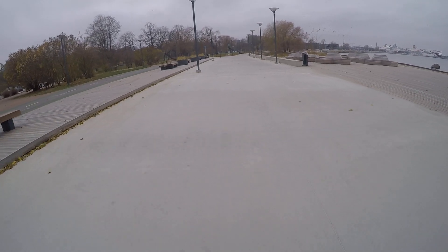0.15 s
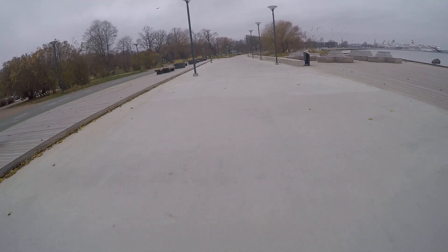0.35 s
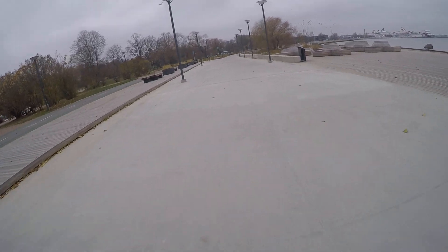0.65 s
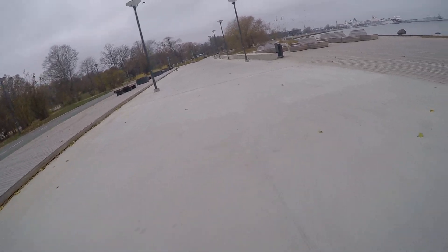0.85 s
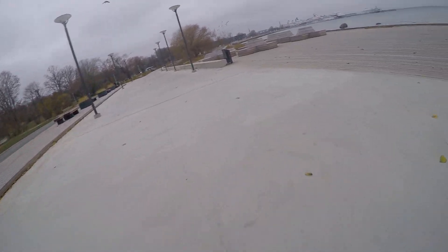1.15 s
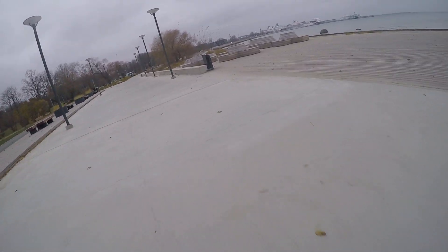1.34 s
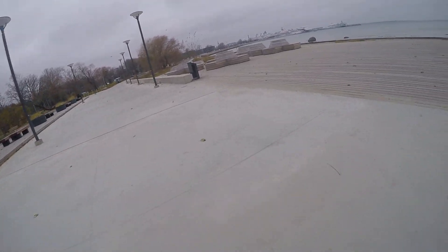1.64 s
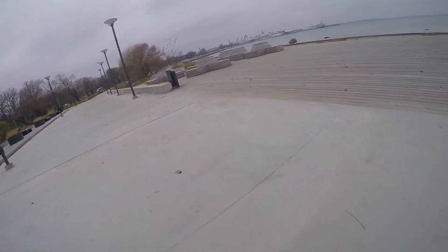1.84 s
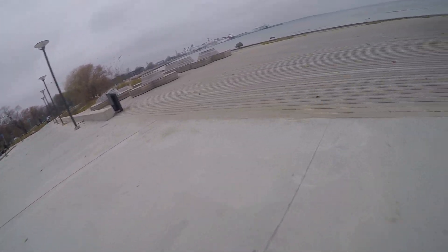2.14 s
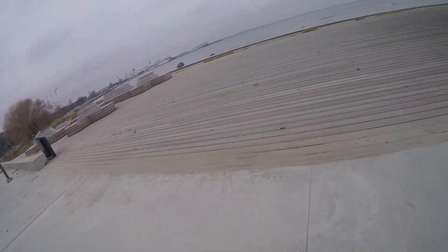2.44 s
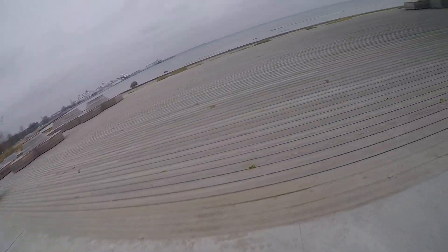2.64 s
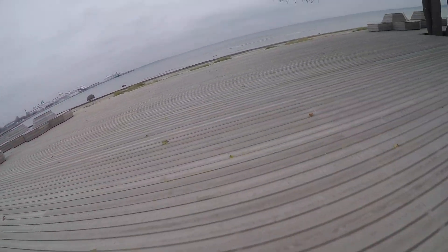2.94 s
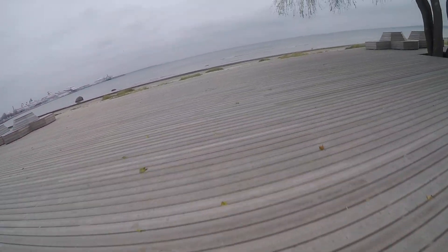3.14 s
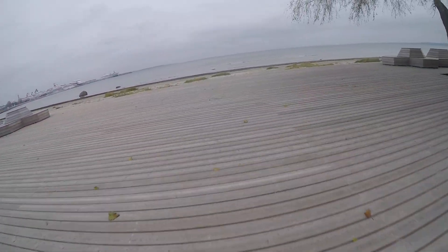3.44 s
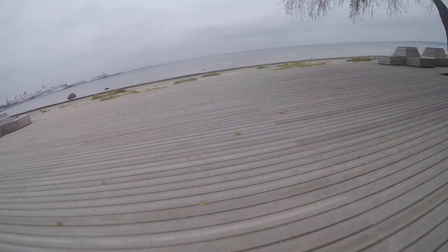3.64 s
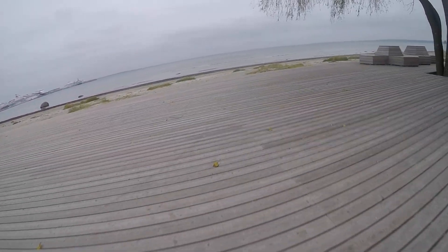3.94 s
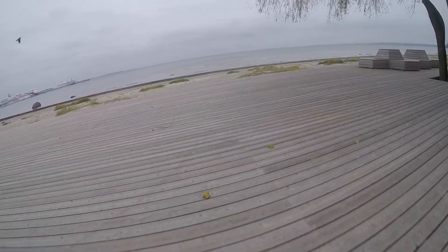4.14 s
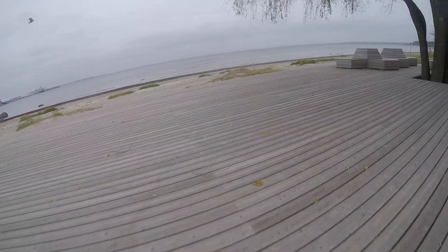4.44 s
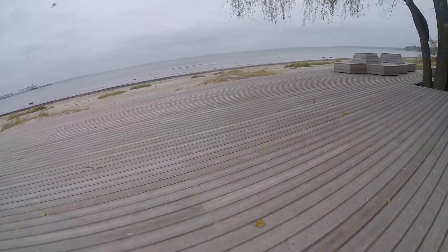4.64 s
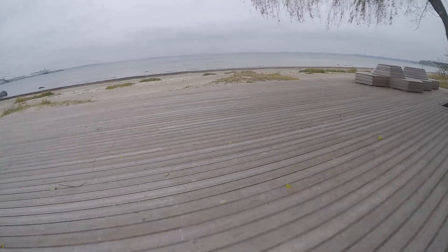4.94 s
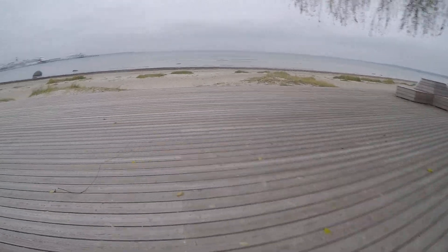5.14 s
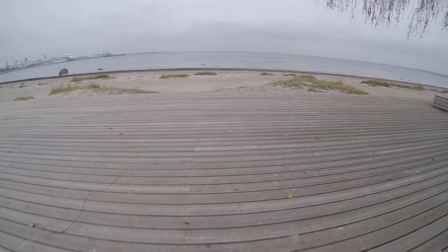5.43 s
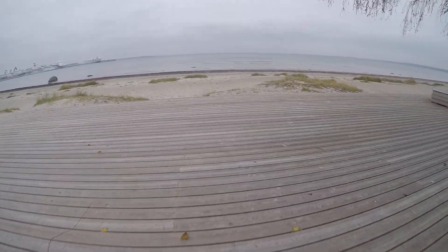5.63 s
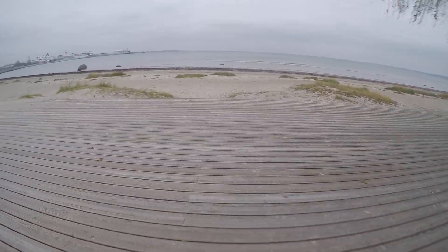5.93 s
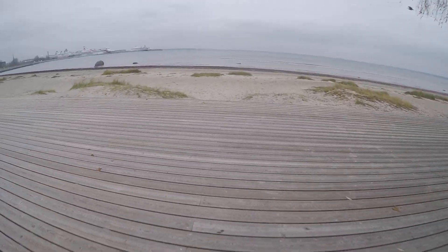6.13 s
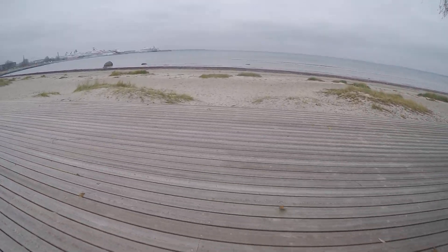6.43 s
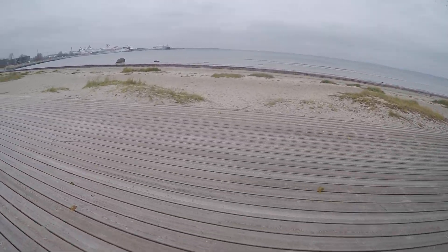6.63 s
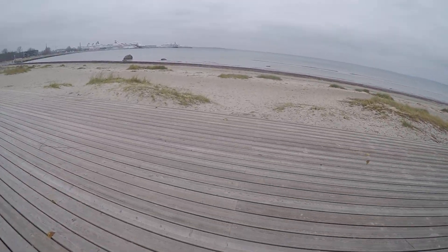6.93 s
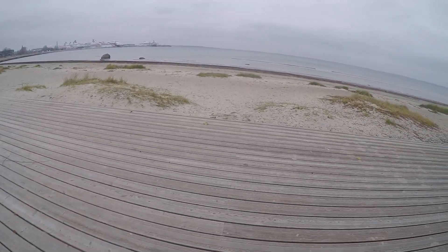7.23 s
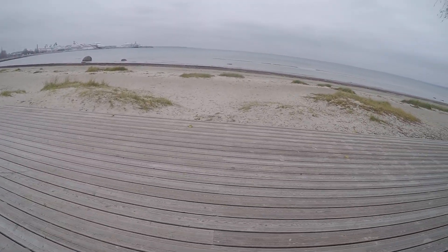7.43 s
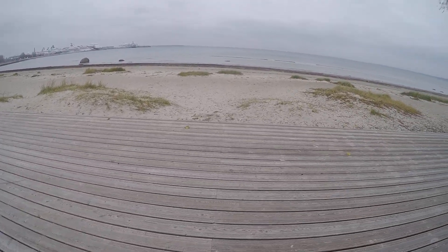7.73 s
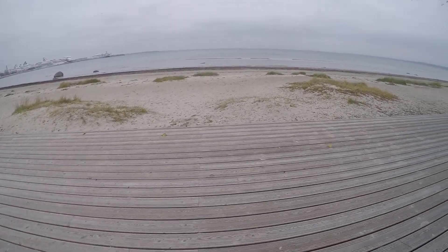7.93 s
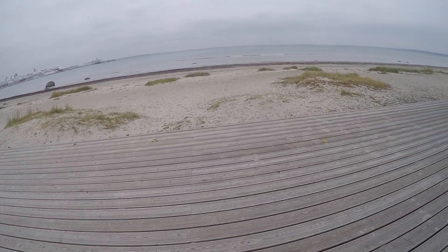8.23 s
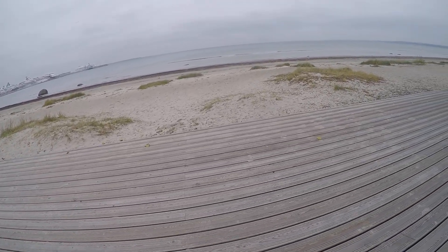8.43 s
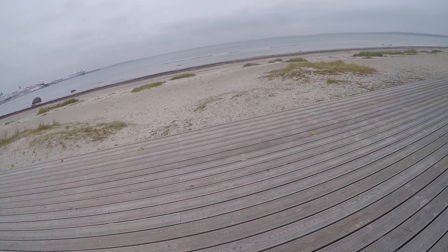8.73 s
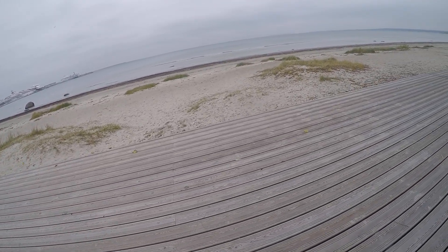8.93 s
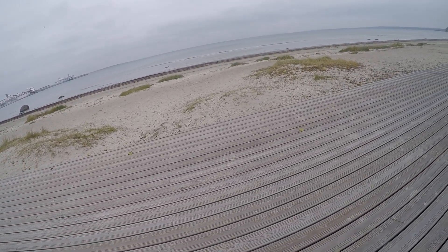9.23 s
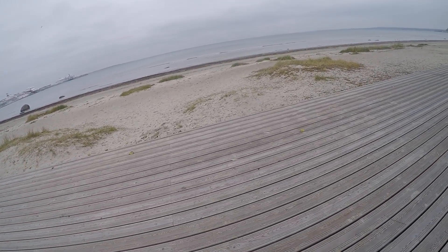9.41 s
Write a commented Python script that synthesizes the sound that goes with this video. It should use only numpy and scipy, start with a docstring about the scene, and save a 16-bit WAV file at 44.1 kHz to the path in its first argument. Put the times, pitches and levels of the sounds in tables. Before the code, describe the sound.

A microphone carried on a rolling scooter catches low wind buffets, a bassy wheel drone and dry tyre scuffs with brief rubbery groans. A boardwalk brings sharper woody slaps from a loose joint and irregular shaking. Braking adds a grainy rub and a high, wavering squeal that peaks at the stop with a big hollow clunk. Then near quiet: a few deep thumps and clacks, and breeze with distant water slowly emerging.

```python
"""Wind buffets the microphone as an electric scooter hums and throbs over concrete, then rattles on a boardwalk.
Its wheel pitch sinks while rubbing pads excite the disc, which squeals in rough and then cleaner fits.
The stop clunks; knocks and light scrapes follow, and the quiet seaside background grows louder.
Hum, motor and squeal are sine oscillators; wind, tyres, pads and shore are coloured noise; the loose joint,
deck and frame ring as decaying modes struck by short contacts."""
import sys
import numpy as np
from scipy import signal
from scipy.fft import rfft, irfft, next_fast_len
from scipy.io import wavfile
from scipy.ndimage import uniform_filter1d

SR = 44100
rng = np.random.default_rng(int(sys.argv[2]) if len(sys.argv) > 2 else 0)


def log_audio(samples):
    """Write samples as a 16-bit WAV file to the path given in sys.argv[1]."""
    # one column per channel
    frames = np.atleast_2d(samples).T
    # limit to full scale, then quantise
    limited = np.clip(frames, -1, 1)
    pcm = np.round(limited * 32767).astype(np.int16)
    wavfile.write(sys.argv[1], SR, pcm)


N = 422037
TIME = np.arange(N) / SR
STOP_S = 7.33


def from_db(db):
    """Level law: decibels to amplitude gain."""
    return 10 ** (np.asarray(db) / 20)


def rms_one(x):
    """Power normalisation: scale to rms 1."""
    return x / np.sqrt(np.mean(x ** 2) + 1e-20)


def in_time(rows):
    """Linear interpolation: each column of a curve at every sample."""
    s, *columns = np.transpose(rows)
    return [np.interp(TIME, s, c) for c in columns]


def noise(spectrum):
    """Spectral shaping: white noise of a given colour, falling 36 dB per octave past its ends; rms 1."""
    hz, db = np.transpose(spectrum)
    octave = np.log2(np.arange(N // 2 + 1) * SR / N + 1)
    known = np.log2(hz)
    outside = np.abs(octave - np.clip(octave, known[0], known[-1]))
    gain = from_db(np.interp(octave, known, db) - 36 * outside)
    size = next_fast_len(N)
    gain = np.interp(np.linspace(0, 1, size // 2 + 1), np.linspace(0, 1, len(gain)), gain)
    return rms_one(irfft(rfft(rng.standard_normal(size)) * gain, size)[:N])


def drift(rate_hz):
    """Low-pass random process: a double pole at rate_hz gives slow chance with spread 1."""
    step = 40   # samples between computed values
    r = np.exp(-2 * np.pi * step * rate_hz / SR)
    chance = rng.standard_normal(N // step + 2002)
    slow = signal.lfilter([1], [1, -2 * r, r * r], chance)[2000:]
    return np.interp(np.arange(N) / step, np.arange(len(slow)), rms_one(slow))


def turning(hz):
    """Phase is the integral of frequency."""
    return 2 * np.pi * np.cumsum(hz) / SR


def add(out, s, sound):
    """Superposition: mix a sound in at time s."""
    at = max(round(s * SR), 0)
    out[at:at + len(sound)] += sound[:len(out) - at]


def strike(modes, contact_s, scuff, vary_db, detune, pitch=1):
    """Modal excitation: a short scuffing contact rings every mode with its own chance strength; peak 1."""
    t = TIME[:SR // 6]
    hz, db, t60 = np.transpose(modes)[:, :, None]
    hz = pitch * hz * (1 + detune * rng.standard_normal(hz.shape))
    signs = (-1) ** np.arange(len(modes))[:, None]
    decay = from_db(db + vary_db * rng.standard_normal(hz.shape) - 60 * t / t60)
    ring = (signs * decay * np.sin(2 * np.pi * hz * t)).sum(0)
    force = scuff * rng.standard_normal(len(t)) * np.exp(-t / contact_s)
    force[0] += 1
    sound = signal.fftconvolve(ring, force)[:len(t)]
    return sound / np.abs(sound).max()


def resonances(x, modes):
    """Parallel resonance: noise through second-order peaks in pairs, each at its own rms level."""
    out = 0
    for hz, width, db in modes:
        peak = np.concatenate(signal.iirpeak(hz, hz / width, fs=SR))
        out = out + from_db(db) * rms_one(signal.sosfilt([peak, peak], x))
    return out


def soften(x, hz, order=2):
    """Low-pass filtering: a soft contact has little treble."""
    return signal.sosfilt(signal.butter(order, hz, fs=SR, output="sos"), x + 1e-18)


def afterring(x, t60, level_db, low_hz):
    """Diffuse decay: convolution with fading noise lets frame and planks ring on after each blow."""
    t = TIME[:SR // 2]
    tail = rng.standard_normal(len(t)) * from_db(-60 * t / t60)
    high_pass = signal.butter(2, low_hz, "high", fs=SR, output="sos")
    tail = signal.sosfilt(high_pass, tail / np.linalg.norm(tail))
    return x + from_db(level_db) * signal.fftconvolve(x, tail)[:N]


# colour of breeze and distant water: f/Hz, relative density level/dB
SHORE_SPECTRUM = [(190, 7), (260, -1.5), (420, -3), (770, 1), (980, -12.5), (1300, -5), (2200, -2),
                  (3000, -8), (4500, -10.5), (7000, -14), (9000, -17.5), (14500, -24)]
# loudness of this background as heard: t/s, level/dB before flutter
SHORE_LEVEL = [(0, -72.5), (8.1, -68.5), (8.65, -63.5), (8.87, -61), (9.03, -64), (9.2, -59), (9.55, -60)]


def shore(flutter_db=2.0):
    """Broadband noise: the background of breeze and distant water grows louder after the stop."""
    return from_db(in_time(SHORE_LEVEL)[0] + flutter_db * drift(21)) * noise(SHORE_SPECTRUM)


# colour of the wind: f/Hz, relative density level/dB
WIND_SPECTRUM = [(15, -14.5), (25, -7), (38, 4.5), (55, -0.5), (90, -4.5), (150, -20), (300, -56.5)]
# gusts on the microphone: t/s, level/dB before trim
GUST_LEVEL = [(0.0, -51), (0.16, -27), (0.26, -47), (0.53, -21.5), (1.22, -32.5), (3.44, -27.5),
              (4.05, -23), (4.97, -25), (6.03, -22), (6.16, -29), (6.27, -17), (6.48, -28), (6.61, -15.5),
              (7.3, -28), (7.35, -11.5), (7.51, -42), (8.6, -31), (8.95, -34.5), (9.1, -39.5),
              (9.17, -34.5), (9.4, -31.5), (9.46, -55)]


def wind(trim_db=1.0, buffet_db=1.0):
    """Pressure fluctuation of turbulent flow: gusts modulate low noise on the microphone."""
    return from_db(in_time(GUST_LEVEL)[0] + trim_db + buffet_db * drift(7.8)) * noise(WIND_SPECTRUM)


# how far the brake is pulled: t/s, share (0-1)
BRAKE_PULL = [(0, 0.1), (3.6, 0.06), (5, 0.55), (6, 0.39), (7.3, 0.94), (7.5, 0)]


def braking():
    """Friction control: the brake's share at every sample."""
    return np.clip(in_time(BRAKE_PULL)[0], 0, 1)


# rolling on the ground: t/s, tyre roar level/dB, rubbing level/dB, both before trims
GROUND_LEVELS = [(0.0, -38.5, -54.5), (0.37, -46, -63), (0.8, -42, -54), (1.05, -41.5, -58),
                 (1.45, -42.5, -54.5), (1.88, -44, -58), (2.35, -39, -49), (2.55, -43.5, -52),
                 (3.17, -36.5, -49), (3.75, -46, -62), (4.26, -42.5, -59.5), (4.39, -44.5, -56.5),
                 (5.4, -46, -53), (6.69, -46, -50.5), (7.33, -51, -54.5), (7.57, -62, -64),
                 (8.07, -63.5, -69), (8.49, -59, -66), (8.89, -70, -76), (9.5, -70, -70)]
# colours of tyre roar, ground rub and pad rub: f/Hz, relative density level/dB
TYRE_SPECTRUM = [(170, 7.5), (240, -4.5), (310, 0.5), (370, 0.5), (440, 5), (535, -14.5), (610, 0.5),
                 (690, -11), (770, -1.5), (950, -17)]
GRIT_SPECTRUM = [(750, -2), (900, 1.5), (1070, 9), (1350, 8.5), (1750, 5.5), (2000, -5), (2300, -9),
                 (2700, -11.5), (3050, -13.5), (3600, -25.5), (5000, -33.5), (8000, -40), (15000, -52.5)]
PAD_SPECTRUM = [(640, -10.5), (780, 8.5), (1030, 0), (1200, 3), (1330, -5.5), (1520, 3), (1850, -2),
                (2060, -17), (2330, -5.5), (2900, -12), (3500, -21), (3900, -27), (4500, -24),
                (6000, -30.5), (15000, -52.5)]
# resonances of the rubbed brake disc: f/Hz, width/Hz, level/dB relative to the pad noise
DISC_MODES = [(2370, 110, -18), (3050, 150, -24.5), (4700, 490, -31), (6670, 590, -38), (10800, 700, -45.5)]


def rolling(tyre_trim_db=0.97, braked_db=-0.5, pads_db=4.0):
    """Friction noise: tyre roar, and a grainy rub sharing its power between ground and brake pads."""
    tyre_db, rub_db = in_time(GROUND_LEVELS)
    brake = braking()
    tyre = from_db(tyre_db + tyre_trim_db + braked_db * brake + 2.5 * drift(24)) * noise(TYRE_SPECTRUM)
    grit = from_db(rub_db + 5.9 * drift(43)) * noise(GRIT_SPECTRUM)
    pad_noise = noise(PAD_SPECTRUM) + resonances(rng.standard_normal(N), DISC_MODES)
    pads = from_db(rub_db + pads_db + 3.8 * drift(25)) * pad_noise
    resting = from_db(np.interp(TIME, [7.4, 7.6], [0, 2]))   # 2 dB are added to the curves after the stop
    return resting * (tyre + np.sqrt(1 - brake) * grit + np.sqrt(brake) * pads)


# light scrapes: t/s, level/dB
SCRAPE_TIMES = [(8.795, -50), (8.811, -48)]
# what the scrapes ring with: f/Hz, width/Hz, relative level/dB
SCRAPE_MODES = [(2130, 630, -1.5), (3600, 650, -8), (6700, 800, -15)]


def scrapes(rise_s=0.005, fall_s=0.018, grain_db=3):
    """Friction-excited resonance: light, bright scrapes as the scooter settles."""
    level = sum(from_db(db) * np.interp(TIME - s, [-rise_s, 0, fall_s], [0, 1, 0])
                for s, db in SCRAPE_TIMES)
    return level * from_db(grain_db * drift(200)) * resonances(rng.standard_normal(N), SCRAPE_MODES)


# colour of the scuffs: f/Hz, relative density level/dB
SCUFF_SPECTRUM = [(500, 6), (750, 4.5), (1000, -4), (1350, 0), (2200, -5), (2700, -7), (3600, -18),
                  (5500, -23), (7500, -28.5)]
# dry scuffs of the tyres: t/s, two thirds of the duration/s, level/dB, bass corner f/Hz, treble corner f/Hz
SCUFF_STROKES = [(0.819, 0.032, -45.5, 480, 2630), (0.905, 0.12, -42, 600, 1100),
                 (1.033, 0.042, -36.5, 748, 1110), (1.237, 0.059, -37, 602, 1800),
                 (1.941, 0.074, -53.5, 901.4, 4000), (2.246, 0.046, -50, 547, 1100),
                 (2.305, 0.041, -37.5, 700, 3000), (2.662, 0.015, -34, 498.6, 1200),
                 (3.12, 0.05, -41, 500, 1400), (7.261, 0.058, -46.5, 700, 3500),
                 (7.484, 0.058, -57.5, 896, 2400), (7.812, 0.11, -49, 499, 4100),
                 (8.507, 0.043, -39, 493, 3590)]


def scuffs(grain_db=5.5):
    """Sliding friction: short grainy rubs as the tyres twist on the ground."""
    out = np.zeros(N)
    rub = noise(SCUFF_SPECTRUM) * from_db(grain_db * drift(120))
    for s, length, db, low_hz, high_hz in SCUFF_STROKES:
        at, size = round(s * SR), int(1.5 * length * SR)
        stroke = np.interp(np.linspace(0, 1, size), [0, .1, .65, 1], [0, 1, .6, 0])
        high_pass = signal.butter(2, low_hz, "high", fs=SR, output="sos")
        thinned = signal.sosfilt(high_pass, rub[at:at + size])
        add(out, s, from_db(db) * stroke * rms_one(soften(thinned, high_hz)))
    return out


# tyre groans in the turns: middle t/s, f/Hz, level/dB, duration/s
GROAN_NOTES = [(0.911, 394, -33, 0.094), (2.264, 695, -36, 0.062), (2.675, 437, -33, .06),
               (2.692, 780.3, -37, 0.037), (2.856, 382, -36, .1), (2.966, 357.5, -36.5, .16),
               (3.15, 375, -39, 0.15)]


def groans(waver=.025, octave_db=-13):
    """Stick-slip: the rubber grips and slips for a moment on a wavering low note."""
    out, wobble = np.zeros(N), drift(70)
    for s, hz, db, length in GROAN_NOTES:
        swell = np.hanning(int(length * SR))
        phase = turning(hz * (1 + waver * wobble[round(s * SR):][:len(swell)]))
        note = np.sin(phase) + from_db(octave_db) * np.sin(2 * phase)
        add(out, s - length / 2, from_db(db) * swell * note)
    return out


# disc modes on the verge of squealing: f/Hz, width/Hz, level/dB before braking and flares
SIZZLE_MODES = [(3630, 150, -61), (7900, 420, -65.5), (7000, 600, -76.5), (4600, 700, -75.5)]


def sizzle(flare_db=6.5, braked_db=22):
    """Resonance near instability: high disc modes flare at random, more as the brake is pulled."""
    gate = np.interp(TIME, [4.3, 5, STOP_S, 7.4], [0, 1, 1, 0])
    level = from_db(braked_db * (braking() - 1.5)) * gate
    flares = 0
    for mode in SIZZLE_MODES:
        flare = from_db(flare_db * np.minimum(drift(15), 2))
        flares = flares + flare * resonances(rng.standard_normal(N), [mode])
    return level * flares


# fits of squeal: loudest t/s, f/Hz, level/dB, rise/s, fall/s, roughness (0-1), octave relative level/dB
SQUEAL_FITS = [(5.03, 3480, -65, .16, 0.24, 0.8, -28), (5.4, 3480, -65.5, 0.12, .12, .7, -25),
               (5.73, 3486, -57.5, 0.21, 0.11, .7, -24), (6.155, 3480, -46.5, 0.17, .11, 0.57, -26.5),
               (6.47, 3501, -63, .15, .1, .2, -22), (6.565, 3480, -47, .05, .06, 0.7, -26),
               (6.595, 3537, -42, 0.086, 0.27, 0.5, -23.5), (6.648, 3380, -44, .04, .04, 0.76, -16),
               (6.665, 3550, -43, .06, 0.17, 0.54, -13.5), (6.675, 3330, -38.5, .04, .04, 0.98, -26),
               (6.92, 3470, -55.5, 0.2, 0.19, 0.4, -24.5), (7.08, 3470, -42, 0.082, 0.043, 0.44, -33),
               (7.2, 3430, -37, .045, .09, 0.5, -37), (7.283, 3530, -29.5, .043, .046, 0.13, -3.5),
               (7.32, 3470, -26.5, 0.067, .098, .1, -25)]
# thin brake chirps: middle t/s, f/Hz, level/dB, duration/s
CHIRP_NOTES = [(6.463, 8220, -66, .022), (6.54, 7880, -58, 0.028), (6.732, 7950, -54, 0.044),
               (7.102, 8800, -68, .03), (7.117, 10100, -69.5, 0.033), (7.172, 7950, -55, 0.048)]


def squeal(swing_db=34, waver_hz=90, third_db=-22, glide=-.012, flutter_db=5.5):
    """Friction-driven self-oscillation: the disc sings in rough fits, then on cleaner notes at the stop."""
    out, wobble, flutter = np.zeros(N), drift(130), drift(60)
    for s, hz, db, rise_s, fall_s, rough, octave_db in SQUEAL_FITS:
        away = np.maximum((s - TIME) / rise_s, (TIME - s) / fall_s)
        on = away < 2
        phase = turning(hz + waver_hz * rough * wobble[on])
        # swing_db is gained during the rise and lost during the fall
        swell = from_db(-swing_db * away[on] + flutter_db * rough * flutter[on])
        overtones = np.sin(2 * phase) + from_db(third_db) * np.sin(3 * phase)
        overtones *= from_db(octave_db) * np.minimum(swell, 1) ** .5   # weaker while the note is soft
        out[on] += from_db(db) * swell * (np.sin(phase) + overtones)
    for s, hz, db, length in CHIRP_NOTES:
        u = np.linspace(-1, 1, int(length * SR))
        falling_hz = hz * (1 + glide * u / 2) + waver_hz * wobble[round(s * SR):][:len(u)]
        add(out, s - length / 2, from_db(db) * np.cos(np.pi * u / 2) * np.sin(turning(falling_hz)))
    return out


# motor overtones: t/s, 2nd, 3rd and 4th level/dB, 6th level/dB (the 8th 1 dB less), before trim
MOTOR_OVERTONES = [(0, -59, -53, -40, -59), (.35, -54, -49.5, -47.5, -58.5), (.6, -49, -51, -44, -58.5),
                   (.9, -54, -40, -46.5, -53), (1.1, -42.5, -40.5, -45, -48.5),
                   (1.4, -53.5, -46.5, -52.5, -59), (1.7, -55.5, -49, -50.5, -61.5),
                   (2.1, -50.5, -46.5, -47, -59.5), (2.35, -35, -44, -43.5, -55),
                   (2.55, -39, -51.5, -46, -73), (2.75, -41.5, -40, -44, -54), (2.92, -51.5, -47, -38, -59),
                   (3.15, -55.5, -57.5, -40.5, -51.5), (3.45, -50.5, -51, -47.5, -69),
                   (4.0, -56, -60.5, -53.5, -69.5), (5.2, -70, -78.5, -74.5, -80.5)]


def motor(phase, level_db=-2.0, waver_db=2.5, shimmy=0.11):
    """Harmonic series: clean overtones at multiples of the wheel pitch, with a slight phase shimmy."""
    second, third, fourth, high = in_time(MOTOR_OVERTONES)
    out = 0
    for k, db in [(2, second), (3, third), (4, fourth), (6, high), (8, high - 1)]:
        level = from_db(db + level_db + waver_db * drift(7))
        out = out + level * np.sin(k * phase + shimmy * drift(8))
    return np.sqrt(2) * out


# main ring of the joint, shifting as the load moves between its faces: t/s, f/Hz
FACE_RING = [(0, 2087), (2.1, 2067), (2.7, 1960), (3.1, 1906), (3.18, 2220), (3.33, 1930), (4.07, 1890),
             (4.25, 2280), (4.34, 2280), (4.45, 1900), (4.72, 1850), (4.77, 2215), (5.32, 2245),
             (6.2, 2190), (8.6, 2255)]
# other modes of the joint: f/Hz, relative level/dB, T60/s
JOINT_MODES = [(437, -16, 0.0053), (893, -6, 0.021), (1170, -3, .014), (1585, -4.5, 0.0037),
               (2570, -5, .009), (3076, 0.5, 0.0063), (3530, 1, 0.0041), (4197, -18, 0.015),
               (4720, -23, 0.0038), (5440, -21, 0.0045), (7000, -23, 0.0028), (9400, -38, .0031),
               (11300, -38.5, 0.001), (2310, -29.5, .12), (1960, -26, 0.12), (3710, -33, 0.062)]


def joint_modes(s):
    """Contact-dependent modes: at time s the ring of the touching face leads the others."""
    return [(np.interp(s, *np.transpose(FACE_RING)), 10, 0.0081)] + JOINT_MODES


# slaps of the loose joint: t/s, level/dB before trims, treble loss per band/dB, slaps in a row
JOINT_SLAPS = [(0.057, -45.5, 16, 1), (0.086, -36, 15, 1), (0.132, -26, 16.5, 2), (.336, -32.5, 17, 1),
               (.49, -29.5, 15, 1), (0.659, -42.5, 33, 2), (.806, -49, 18.5, 1), (0.825, -43.5, 31, 2),
               (.862, -51, 21, 1), (.96, -52, 4.5, 1), (1.007, -29.5, 16.5, 1), (1.05, -27.5, 15, 4),
               (1.173, -48.5, 19, 1), (1.245, -39, 20, 1), (1.302, -53, 24, 1), (1.41, -39.5, 13.5, 1),
               (1.516, -46.5, 18, 1), (1.542, -45.5, 18, 1), (1.561, -44, 21, 1), (1.577, -40.5, 28, 1),
               (1.725, -38, 27, 1), (1.743, -33, 18, 2), (1.912, -27.5, 34, 1), (2.022, -46, 23, 1),
               (2.04, -31, 27, 1), (2.102, -56.5, 29, 1), (2.419, -41.5, 33, 1), (2.504, -43.5, 7, 1),
               (2.563, -36.5, 32, 1), (2.69, -58, 13, 1), (2.718, -22, 3.5, 1), (2.769, -51, 20, 2),
               (2.847, -38, 25, 1), (2.893, -41, 11.5, 1), (3.001, -30, 15.5, 1), (3.104, -23, 0.5, 1),
               (3.182, -21.5, 13, 1), (3.242, -32, 31, 1), (3.288, -35.5, 22, 1), (3.325, -30, 0.5, 1),
               (3.56, -30, 14, 1), (3.591, -38.5, 14.5, 1), (3.631, -43.5, 12, 1), (3.647, -41, 14, 1),
               (3.661, -29.5, 12.5, 1), (3.712, -42, 19, 1), (3.819, -44.5, 10, 1), (3.975, -50, 11, 1),
               (4.012, -44, 17, 1), (4.063, -21, 23.5, 1), (4.231, -47, 23, 1), (4.254, -29.5, 14, 1),
               (4.294, -21.5, 17.5, 1), (4.308, -20.5, 10, 1), (4.321, -26, 15, 1), (4.335, -21.5, 17, 1),
               (4.368, -44, 13, 1), (4.411, -35.5, 19, 1), (4.462, -27, 34, 2), (4.54, -31, 8, 1),
               (4.562, -24, 12.5, 1), (4.577, -50, 14, 1), (4.619, -24, 17.5, 1), (4.723, -28, 33, 1),
               (4.766, -29, 13.5, 1), (4.795, -55, 13, 1), (4.81, -22.5, 12, 2), (4.857, -24, 15, 3),
               (4.973, -39, 16, 1), (4.997, -20.5, 10.5, 1), (5.104, -33, 24, 1), (5.125, -31.5, 19, 1),
               (5.156, -26.5, 17, 1), (5.17, -19.5, 11, 1), (5.238, -35.5, 17, 1), (5.269, -29.5, 15.5, 2),
               (5.303, -35, 27, 1), (5.316, -22.5, 14, 1), (5.518, -36, 14, 1), (5.608, -46, 14, 1),
               (5.631, -42.5, 18, 1), (5.695, -35, 25, 1), (5.748, -31.5, 25, 1), (5.786, -27.5, 13, 1),
               (5.88, -43.5, 24.5, 1), (5.947, -47, 25, 1), (5.961, -22.5, 15, 1), (6.053, -33.5, 19, 1),
               (6.131, -43, 32, 1), (6.175, -42, 20, 1), (6.195, -25.5, 15, 1), (6.274, -46.5, 32, 1),
               (7.098, -27.5, 28, 1), (7.334, -21.5, 14, 1), (7.339, -20.5, 7.5, 1), (7.387, -29.5, 7, 1),
               (7.413, -22, 6.5, 1), (7.648, -52, 6, 1), (7.772, -32, 15, 1), (7.807, -41, 17, 2),
               (7.9, -33.5, 3.5, 1), (7.929, -42, 12, 1), (8.128, -57, 4, 1), (8.545, -27, 11.5, 1),
               (8.599, -25.5, 31, 1)]


def slaps(wheel_hz, loss_db=0.2, cycles=1.03):
    """Forced vibration: a jolted joint slaps about once per cycle; rows of t/s, level/dB, treble loss/dB."""
    hits = []
    for s, db, dull_db, count in JOINT_SLAPS:
        period = cycles / np.interp(s, TIME, wheel_hz)
        hits += [(s + k * period, db - k * loss_db, dull_db) for k in range(round(count))]
    return hits


# bands of ring, edge and crack: lower f/Hz, upper f/Hz
RING_EDGE_CRACK = [(450, 2700), (2950, 4800), (5100, 15000)]
# where the joint hardly rings: f/Hz, width/Hz
RING_NOTCHES = [(2700, 40), (3980, 130)]


def rattle(hits, trim_db=(0.5, 3.0, -8), rebound_db=-11, rebound_s=0.0021):
    """Impact and rebound: a woody ring, with more bright edge and crack where the treble loss is small."""
    out = np.zeros(N)
    bands = [signal.butter(2, band, "band", fs=SR, output="sos") for band in RING_EDGE_CRACK]
    dips = [np.concatenate(signal.iirnotch(hz, hz / width, fs=SR)) for hz, width in RING_NOTCHES]
    for s, db, dull_db in hits:
        blow = strike(joint_modes(s), contact_s=.0018, scuff=.09, vary_db=2.8, detune=.02)
        slap = signal.sosfilt(dips, blow)
        add(slap, rebound_s * rng.uniform(0.46, 3.8), from_db(rebound_db) * slap)   # it bounces once
        for k, (band, trim) in enumerate(zip(bands, trim_db)):
            part = signal.sosfilt(np.vstack([band, band]) if k else band, slap)
            part *= np.sqrt(SR / 100) / np.linalg.norm(part)   # equal energy: rms 1 over 10 ms
            add(out, s, from_db(db - k * dull_db + trim) * part)
    return out


def ticks(phase, level_db=-41, spread_db=-0.5, dull_hz=2600, threshold=0.4):
    """Intermittent contact: on the planks the joint buzzes in fits, touching lightly once per cycle."""
    out, fit = np.zeros(N), drift(14)
    cycles = np.flatnonzero(np.diff(phase // (2 * np.pi)))
    on_planks = (TIME[cycles] > 2.7) & (TIME[cycles] < 6.3)
    for at in cycles[(fit[cycles] > threshold) & on_planks]:
        size = from_db(level_db + spread_db * min(rng.standard_normal(), 2))
        touch = strike(joint_modes(TIME[at]), contact_s=.002, scuff=.3, vary_db=3.0, detune=.03)
        add(out, TIME[at] + rng.uniform(0, 0.00097), size * touch)
    return soften(out, dull_hz)


# knocks on the deck: t/s, hollow body level/dB, body pitch ratio, hard clack level/dB, before softening
DECK_KNOCKS = [(7.269, -32, 1.0, -41), (7.317, -18, 1.23, -19.5), (7.3422, -0.5, 1.05, -17),
               (7.347, -13, 1.03, -28), (7.375, -40, 0.81, -28), (7.386, -37, .65, -20),
               (7.405, -27, 0.53, -23), (7.4138, -7, 1.056, -14.5), (7.443, -42, 0.63, -42),
               (7.626, -53, .89, -40.5), (7.712, -49, 0.86, -47), (7.814, -22, 0.8, -34),
               (7.899, -38, 0.76, -18), (7.917, -33, 1.12, -30), (8.129, -36.5, 1.23, -47),
               (8.221, -20, 0.79, -34), (8.25, -28, .96, -36.5), (8.511, -39, 0.83, -22.5),
               (8.527, -10.5, 0.77, -22), (8.551, -19, 1.1, -27), (8.578, -31, 0.77, -8),
               (8.599, -20.5, 1.44, -19), (8.635, -36, 1.13, -20.5), (8.740, -45, .8, -45)]
# modes of the hollow deck and of its hard clack: f/Hz (the deck's at pitch ratio 1), relative level/dB, T60/s
DECK_MODES = [(363, -22, 0.069), (450, -10, .02), (597, 0, .021), (744, -20.5, 0.097), (885, -18, 0.023)]
CLACK_MODES = [(1220, -3, 0.012), (1610, 3.5, .013), (1750, -12.5, .011), (2220, -16.5, 0.0057),
               (3320, -23, .012)]


def knocks(body_hz=1300, clack_hz=3000):
    """Impact on a hollow body: each blow is hollow and hard at once, with a dull wash of plank noise."""
    body, clack = np.zeros((2, N))
    for s, body_db, pitch, clack_db in DECK_KNOCKS:
        hollow = strike(DECK_MODES, contact_s=.002, scuff=.05, vary_db=1.2, detune=.012, pitch=pitch)
        hard = strike(CLACK_MODES, contact_s=.004, scuff=.08, vary_db=1.5, detune=.03)
        add(body, s, from_db(body_db) * hollow)
        add(clack, s, from_db(clack_db) * hard)
    both = soften(body, body_hz) + soften(clack, clack_hz)
    return afterring(both, t60=0.11, level_db=-8.5, low_hz=420)


def thump(hz, rise_s, fall_s):
    """Damped oscillation: a deep swing that swells and dies; envelope peak 1."""
    t = TIME[:SR // 2]
    swell = (1 - np.exp(-t / rise_s)) ** 2 * np.exp(-t / fall_s)
    return swell / swell.max() * np.sin(2 * np.pi * hz * t)


# deep thumps, first a wind gust on the microphone at 0.113 s, then jolts that set the stem swaying:
# t/s, envelope peak level/dB, f/Hz
DEEP_THUMPS = [(0.113, -3.5, 62.5), (7.34, -14, 59.6), (7.373, -0.5, 84.1), (7.817, -14, 83),
               (7.924, -14, 93.6), (8.227, -4.5, 87.2), (8.280, -7, 87.6), (8.529, -3, 90),
               (8.592, -4.5, 90.9), (8.664, -12, 86)]
# faint ringing added to each deep thump: f/Hz, level/dB relative to the thump, T60/s
THUMP_MODES = [(357, -45.5, 0.25), (442, -38.5, 0.33), (674, -48, .25), (905, -53.5, 0.57)]


def thumps(hits, slap_db=13, slap_hz=82):
    """Impulse response: a gust, then stem jolts, give deep ringing thumps; rolling slaps give short ones."""
    out, t = np.zeros(N), TIME[:SR // 2]
    ring = sum(from_db(db - 60 * t / t60) * np.sin(2 * np.pi * hz * t) for hz, db, t60 in THUMP_MODES)
    for s, db, hz in DEEP_THUMPS:
        add(out, s, from_db(db) * (thump(hz, rise_s=0.0042, fall_s=0.034) + ring))
    short = thump(slap_hz, rise_s=0.0029, fall_s=0.015)
    for s, db, _ in hits:
        if s < STOP_S:
            add(out, s, from_db(db + slap_db) * short)
    return out


# steady shaking under the throbs, stronger on the planks: t/s, level/dB before its unevenness
STEADY_SHAKING = [(0, -18), (.3, -31), (.6, -22), (1.5, -24.5), (3.1, -24), (3.65, -13), (4.25, -15.5),
                  (4.5, -16), (6.7, -16.5), (7.3, -17)]
# throbs as the wheels meet uneven ground: middle t/s, level/dB, width at -6 dB/s
FRAME_THROBS = [(0.112, -15, 0.068), (0.372, -13.5, 0.054), (0.53, -10, 0.071), (0.678, -14, 0.12),
                (0.824, -15, 0.095), (0.965, -8.5, 0.15), (1.124, -9.5, 0.084), (1.338, -9, 0.16),
                (1.624, -11, 0.054), (1.803, -9.5, 0.19), (2.076, -13, 0.087), (2.178, -10.5, 0.096),
                (2.34, -11, 0.15), (2.518, -11.5, 0.11), (2.686, -13, 0.097), (2.891, -9.5, 0.17),
                (3.174, -9.5, 0.14), (3.3, -10.5, 0.081), (3.452, -12.5, 0.095)]


def shaking_level(uneven_db=3.0):
    """Power addition: throbs swell and ebb over a steady, uneven shaking; rms gain."""
    power = from_db(in_time(STEADY_SHAKING)[0] + uneven_db * drift(10)) ** 2
    for s, db, length in FRAME_THROBS:
        halvings = 2 * (2 * (TIME - s) / length) ** 2
        power += from_db(db) ** 2 * .5 ** np.minimum(halvings, 40)
    return np.sqrt(power)


# share of the shaking power that is a steady hum, lost on the planks: t/s, share (0-1)
HUM_SHARE = [(0, 0.32), (.6, 0.87), (2.6, 0.89), (3.4, 0.65), (4.3, 0.7), (5.6, 0.43), (6, 0.21), (9.5, 0)]
# colours of the shaken frame and of the standing stem: f/Hz, relative density level/dB
FRAME_SPECTRUM = [(30, -36), (50, -7.5), (70, -4.5), (92, 9), (108, -6.5), (130, -2.5), (165, -33),
                  (230, -47.5), (400, -64.5)]
STEM_SPECTRUM = [(45, -11.5), (70, -4), (90, 7.5), (106, -5), (130, -22)]
# slight swaying of the standing scooter: t/s, level/dB
STANDING_SWAY = [(7.3, -61), (7.6, -35), (8.1, -34), (8.7, -28), (9.02, -42.5), (9.11, -40), (9.16, -34),
                 (9.41, -33), (9.47, -37)]


def frame(wheel_hz, overtone_db=-40, damping_hz=165, wander_hz=0.77):
    """Forced vibration: the wheels drive a deep hum at their pitch; planks break it into irregular shaking."""
    level, smooth = shaking_level(), np.clip(in_time(HUM_SHARE)[0], 0, 1)
    phase = turning(wheel_hz + wander_hz * drift(7.45))
    shaking = np.sqrt(2 * smooth) * np.sin(phase) + np.sqrt(1 - smooth) * noise(FRAME_SPECTRUM)
    # even out the short-term power so that only the level curve shapes the throbs
    power = uniform_filter1d(uniform_filter1d(shaking ** 2, size=2200), size=900)
    shaking /= np.sqrt(power + 1e-9)
    overtone = smooth * level * from_db(overtone_db) * np.sin(2 * phase)
    moving = soften(level * shaking, damping_hz) + overtone
    standing = from_db(in_time(STANDING_SWAY)[0]) * noise(STEM_SPECTRUM)
    share_rolling = np.interp(TIME, [7.32, 7.37], [1, 0])
    return share_rolling * moving + (1 - share_rolling) * standing


# wheel vibration, sinking with the speed: t/s, f/Hz
WHEEL_PITCH = [(0, 109), (.6, 104.4), (1.0, 100.8), (1.45, 99.14), (1.7, 95.3), (2.0, 96.1), (2.35, 97.3),
               (2.7, 94.76), (2.9, 93), (3.15, 89.35), (3.5, 85.37), (4.3, 76.07), (5.9, 69.3)]


def scene():
    """Linear superposition: all sources, with hum, motor and joint following one wheel pitch."""
    wheel_hz = in_time(WHEEL_PITCH)[0]
    phase, hits = turning(wheel_hz), slaps(wheel_hz)
    background = shore() + wind() + rolling()
    rubs = scrapes() + scuffs() + groans()
    brake = sizzle() + squeal()
    # each sum of impacts carries its own faint tail
    joint_and_ticks = rattle(hits) + ticks(phase)
    joint = afterring(joint_and_ticks, t60=0.21, level_db=-25.0, low_hz=350)
    blows = joint + knocks() + thumps(hits)
    return (background + rubs + brake + motor(phase) + blows + frame(wheel_hz))[None]


def record(dry):
    """Saturation and band limiting: the highest peaks are rounded and the top is cut at 16.2 kHz."""
    rounded = dry / (1 + (dry / .97) ** 8) ** (1 / 8)
    return signal.sosfilt(signal.cheby2(12, 70, 16200, fs=SR, output="sos"), rounded)


dry = scene()
out = record(dry)
log_audio(out)
```